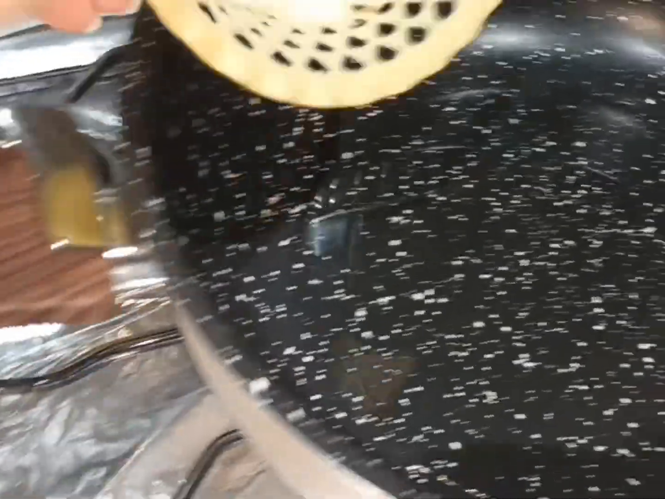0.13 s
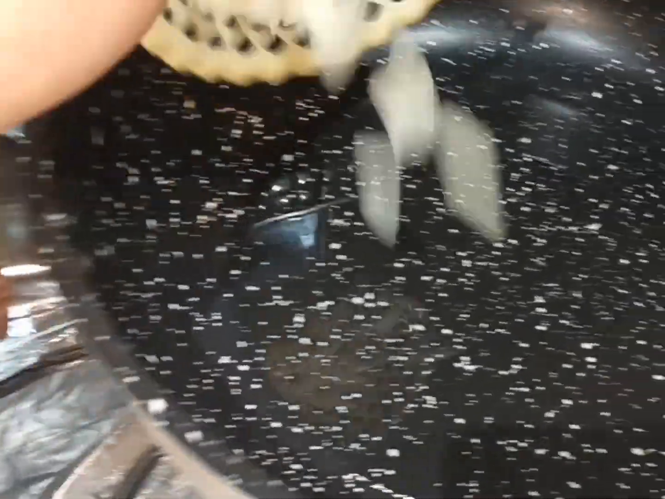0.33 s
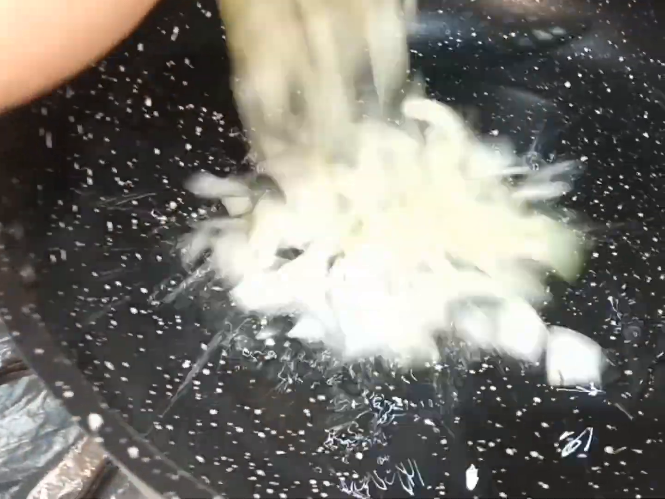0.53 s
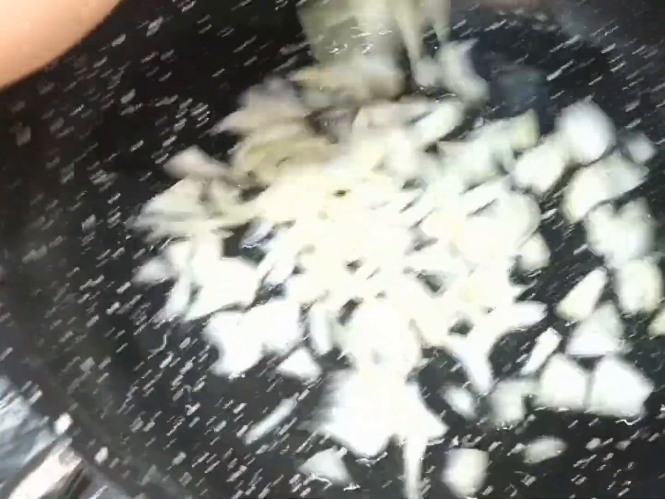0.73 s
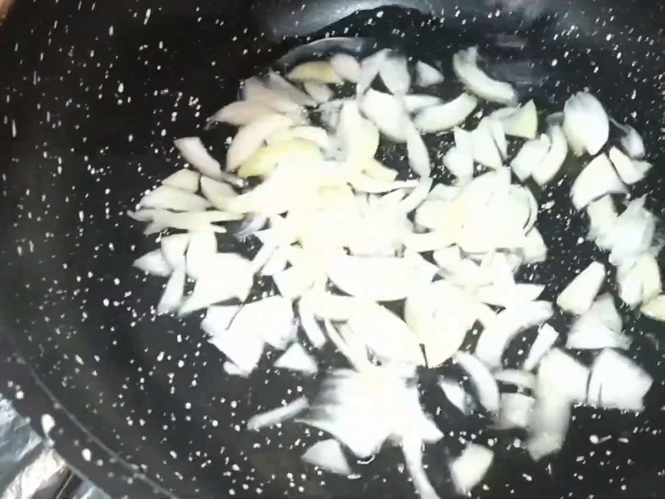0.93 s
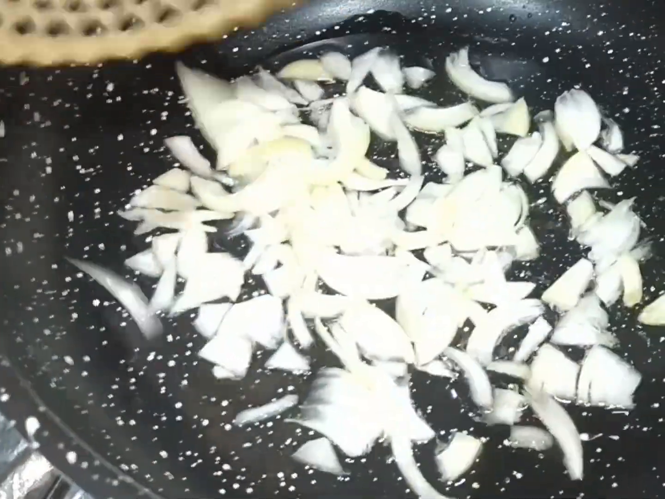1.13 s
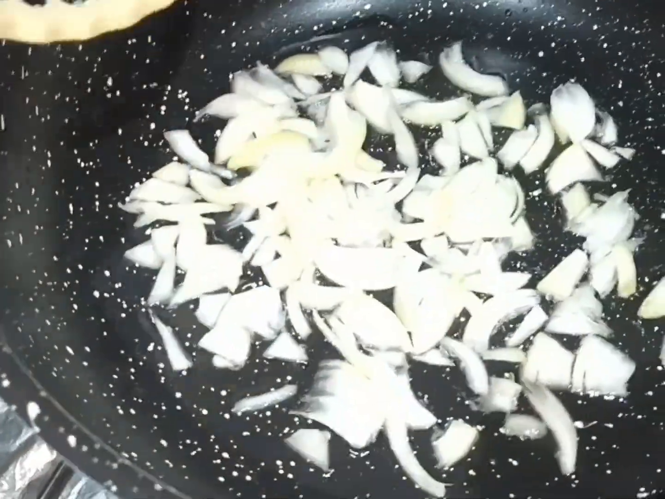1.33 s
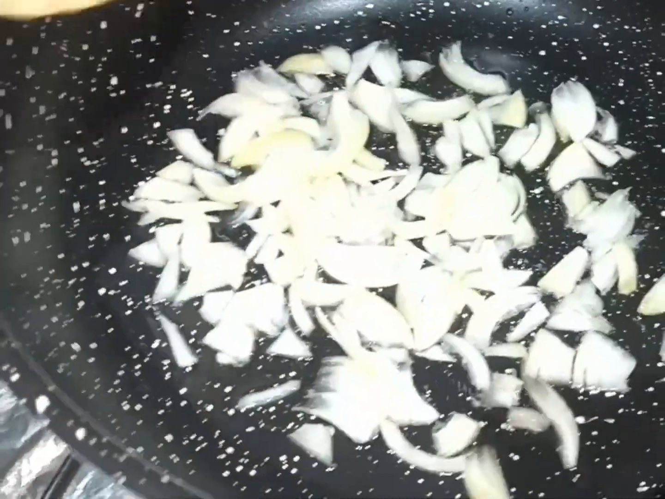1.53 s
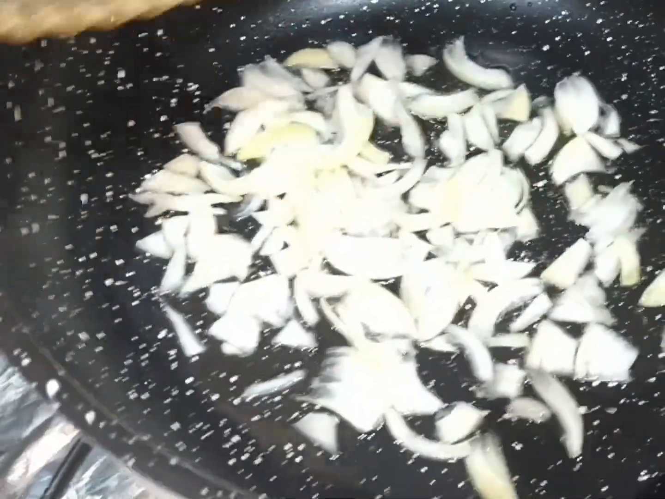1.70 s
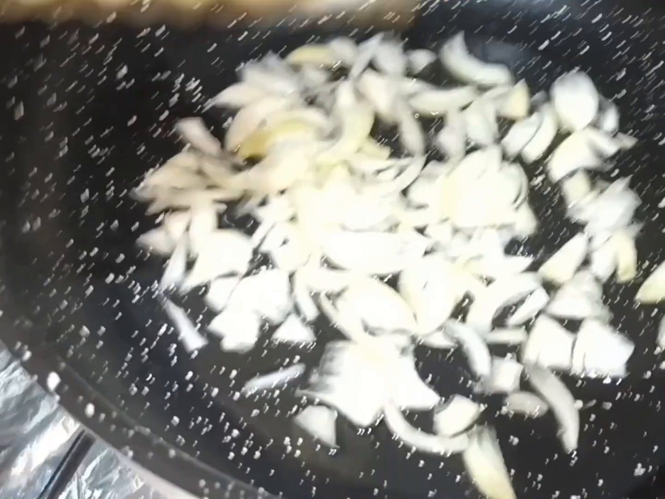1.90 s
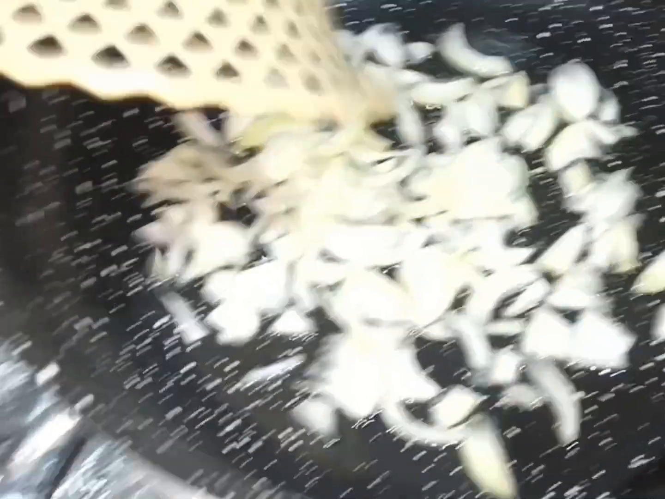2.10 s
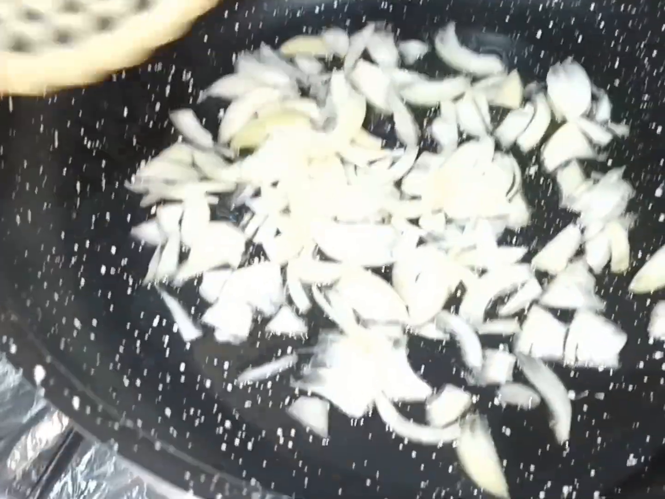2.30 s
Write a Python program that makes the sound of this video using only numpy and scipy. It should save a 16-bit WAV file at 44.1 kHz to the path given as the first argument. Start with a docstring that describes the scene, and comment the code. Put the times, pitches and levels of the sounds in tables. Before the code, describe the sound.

Sliced onions tumble into a pan, then a plastic colander knocks on the rim.

```python
"""Onion into a warm pan

A small kitchen, a stereo pair close to the stove. Sliced onion slides out of a plastic colander into
a warm nonstick pan: clumps drum on its floor, loose slices patter wetly after them, and bursting
bubbles set up a faint sizzle. The colander is then knocked on the rim, dully at first and twice
sharply, and the pan rings into the room. A limiter ducks the hardest blows."""
import sys
import numpy as np
from scipy import signal
from scipy.fft import rfft, irfft, next_fast_len
from scipy.io import wavfile

SR = 44100
rng = np.random.default_rng(int(sys.argv[2]) if len(sys.argv) > 2 else 0)


def wav_out(sig):
    """Save sig, one row per channel (or a flat mono array), as 16-bit PCM at SR to the path in sys.argv[1]."""
    wavfile.write(sys.argv[1], SR, np.round(np.clip(np.atleast_2d(sig).T, -1, 1) * 32767).astype(np.int16))


N = 103635
T = np.arange(N) / SR
AGE = T[:SR]  # seconds into a single event

# likeness of the two microphones: freq_hz, correlation
MIC_LIKENESS = [(60, 0.66), (300, 1), (500, 0.36), (950, 0.085), (3000, 0.22), (16000, 0)]
# balance between the microphones: freq_hz, left_over_right_db
MIC_BALANCE = [(60, 1), (300, 1.5), (600, 1.5), (1200, 2), (2000, 8), (4000, 5), (8000, 4.5), (15000, -4)]

# hiss of the quiet kitchen: freq_hz, level_db
ROOM_SPECTRUM = [(25, -13), (80, 4), (170, 2.5), (500, 3), (620, -8), (750, 8.5), (1150, -5.5), (1550, 12),
                 (1800, -4.5), (2120, 14), (2550, -0.5), (3000, 4.5), (5500, -18), (16000, -65)]
# low rumble under the cooking: time_s, level_db
RUMBLE_CURVE = [(.25, -81), (.38, -66.5), (.65, -63), (.82, -75), (1.2, -53.5), (1.4, -82.5), (1.75, -61),
                (2.25, -61), (2.35, -111)]
# its tone: freq_hz, level_db
RUMBLE_SPECTRUM = [(25, -30), (55, -26), (72, -22), (87, -0.5), (115, -27), (170, -9.5), (300, -7),
                   (1000, -82)]

# wet onion sizzling on warm metal: time_s, level_db
SIZZLE_CURVE = [(.22, -78), (.3, -46), (.5, -53.5), (.9, -54.5), (1.15, -56), (1.35, -58), (1.62, -54.5),
                (1.8, -61), (2.1, -58.5), (2.35, -63)]
# its tiny bubbles: freq_hz, level_db
SIZZLE_SPECTRUM = [(2500, -24), (4000, -9.5), (5200, -9), (7600, -11.5), (10500, -2.5), (12000, -15.5),
                   (13500, -18), (15000, -18), (16000, -4)]
# sheen that the sizzle draws from the pan: time_s, level_db
SHEEN_CURVE = [(.25, -79.5), (.4, -72), (.68, -56.5), (.8, -61), (1.18, -59.5), (1.35, -71)]
# its tone: freq_hz, level_db
SHEEN_SPECTRUM = [(3000, -45), (4500, -8), (5050, 1.5), (5450, -5), (5900, -1.5), (6700, -7), (9000, -42)]
# the loudest oil pops: start_s, pitch_hz, level_db, left_over_right_db
OIL_POPS = [(.786, 2800, -52, 10), (.98, 5420, -36, 9.5), (1.464, 4700, -48, 9)]
# small wet spits: start_s, level_db, left_over_right_db
SPITS = [(0.123, -54, 6), (0.401, -31, 7), (0.631, -43, 3), (0.746, -44, -1), (1.613, -41, 3),
         (2.219, -38, -11), (2.228, -55, -26)]
# their tone: freq_hz, level_db
SPIT_SPECTRUM = [(1000, -20), (3500, -12), (6400, 11), (8000, -3), (11500, 12.5), (13000, -39),
                 (15500, 5.5)]

# clumps landing in the pan: start_s, ring_db, slap_db
CLUMP_LANDINGS = [(0.235, -36, -51), (.263, -24, -31.5), (.277, -31, -47), (0.288, -28, -57),
                  (0.34, -24, -42), (0.355, -28, -47), (.364, -28, -49), (.412, -29.5, -35),
                  (.474, -32.5, -39.5), (0.517, -42, -44.5), (.57, -41.5, -47.5), (.632, -46, -67),
                  (.672, -48, -45), (0.691, -51, -44)]
# the pan's floor ringing under the onion: pitch_hz, level_db, t60_s
PAN_FLOOR_MODES = [(295, 0, .17), (330, -12, .17), (393, -15, .17), (432, -5, .12), (470, -12, .15),
                   (522, -13, .2), (655, -17, .13), (840, -9, .11), (1085, -19, .11), (1362, -19, .17)]
# slap of a clump: freq_hz, level_db
SLAP_SPECTRUM = [(100, -38), (200, -14), (290, 6.5), (520, 4.5), (680, -9), (860, -2.5), (1300, -37),
                 (1800, -36), (5000, -44)]
# patter of loose slices: time_s, wet_db, body_db
PATTER_CURVE = [(0.228, -70, -106), (0.239, -35, -53), (0.254, -38.5, -45), (.28, -46, -48.5),
                (0.327, -53.5, -48.5), (0.346, -33.5, -37.5), (.375, -36.5, -33), (0.408, -37.5, -39),
                (.44, -40.5, -45), (.57, -45.5, -62.5), (.64, -49, -63.5), (.72, -66, -65),
                (0.854, -66, -70.5)]
# its wet crackle: freq_hz, level_db
WET_SPECTRUM = [(1470, -29), (2500, -12), (3210, -13), (4050, -4), (5780, 2), (8140, -6.5), (9660, 0.5),
                (11500, -4), (13500, -15), (14900, -2), (16000, -5.5)]
# its soft body: freq_hz, level_db
BODY_SPECTRUM = [(80, -28), (180, -0.5), (300, -3.5), (700, 8), (1500, -2), (2600, -2.5), (4000, -3),
                 (7000, -12)]

# colander on the rim: start_s, crack_db, treble_db, thud_db, ring_db, room_db, thock_db
RIM_KNOCKS = [(0.8593, -20.5, -15, -31.5, -44, -42, -24.5), (0.884, -40, -12, -54, -48, -62, -24),
              (0.941, -39, -31, -38, -58, -44.5, -34), (0.979, -40.5, -9, -39.5, -79, -56, -42),
              (1.048, -32, -34.5, -42.5, -47, -49, -35.5), (1.4752, -26.5, -22.5, -37.5, -47.5, -42.5, -32),
              (1.635, -58, -43, -50, -59, -67, -47.5), (1.789, -16, 4, -28, -40, -26, -66),
              (1.9603, -20, 4.5, -31, -42, -30.5, -65), (2.124, -62, -26, -54.5, -56.5, -57.5, -41.5)]
# the pan struck at its rim: pitch_hz, level_db, t60_s
PAN_RIM_MODES = [(292, -8, .25), (347, -1, .34), (440, -6, .3), (463, -4, .25), (493, -4, .22),
                 (520, -10, .35), (662, -13, .28), (975, 1, .3), (1362, 3, .32), (1927, 3, .32),
                 (2449, 2, .28), (4834, -2, .14), (5044, 0, .26), (5262, 0, .22), (5480, -2, .18),
                 (5728, -3, .23)]
# crack of plastic on metal: freq_hz, level_db
CRACK_SPECTRUM = [(150, 12), (400, -42), (750, -13), (1250, -8.5), (1850, -3), (2200, -13), (2600, -1),
                  (3600, -22), (4500, 1), (5300, 4.5), (6200, -9), (7600, -10), (9200, -4), (11000, -8),
                  (12300, -13), (13800, -30), (14800, -9), (16500, -2.5)]
# hollow body of the colander: pitch_hz, level_db, t60_s
COLANDER_MODES = [(405, -2, .06), (462, 0, .09)]
# low notes that build after a blow and hang on: pitch_hz, level_db, rise_s, t60_s
HANGING_NOTES = [(96, -15, .06, .3), (135, -15, .08, .3), (167, -12, .13, .32), (241, -10, .14, .28),
                 (440, -11, .12, .24), (526, -13, .14, .25)]
# slow boom in the room: freq_hz, level_db
BOOM_SPECTRUM = [(40, -18), (65, -20), (85, -4.5), (130, -5), (190, 1), (300, -1.5), (500, -0.5),
                 (600, -19), (1200, -11.5), (4000, -38)]
# the kitchen's bright tail: freq_hz, level_db
TAIL_SPECTRUM = [(60, -24), (500, -2), (1000, -6.5), (2000, -3.5), (3500, -1.5), (4500, 0), (5300, 6),
                 (6500, -6), (8000, -10), (10000, -0.5), (13000, -16.5), (15000, -17)]
# its decay: freq_hz, t60_s
TAIL_DECAY = [(500, 0.47), (2000, 0.27), (5000, 0.28), (9000, 0.18), (15000, 0.19)]

FLOOR_CUT_HZ, RIM_CUT_HZ = 277, 142
CUSHION_FROM_S, CUSHION_DB_PER_S, CUSHION_ABOVE_HZ = .38, 45, 650  # the growing heap dulls later clumps


def amp(db):
    """Decibels to gain."""
    return 10 ** (np.asarray(db) / 20)


def unit(x):
    """Scales to rms 1."""
    return x / np.sqrt(np.mean(x ** 2) + 1e-20)


def read(points, hz):
    """Reads a table on a log-frequency axis."""
    freqs, values = np.transpose(points)
    return np.interp(np.log(hz + 1), np.log(freqs + 1), values)


def fader(curve):
    """Gain over the scene from a level curve."""
    return amp(np.interp(T, *np.transpose(curve)))


def balance(db):
    """Left and right gains for a level difference."""
    return amp(np.array([np.atleast_1d(db), -np.atleast_1d(db)]) / 2)


def add(mix, start_s, sound):
    """Mixes a sound in at a time."""
    part = mix[:, max(round(start_s * SR), 0):][:, :sound.shape[1]]
    part += sound[:, :part.shape[1]]


def rise(seconds):
    """Linear attack."""
    return np.minimum(AGE / seconds, 1)


def fade(t60_s, hold_s=0):
    """Exponential decay, after an optional rounded plateau."""
    return np.exp(-np.log(1000) * (np.hypot(AGE, hold_s) - hold_s) / t60_s)


def low_cut(x, hz):
    """Takes the bass out."""
    return signal.sosfilt(signal.butter(4, hz, "highpass", fs=SR, output="sos"), x)


def colour(x, spectrum):
    """Shapes two unrelated channels as the microphones hear them: bass central, treble wide and left."""
    size = next_fast_len(x.shape[1])
    hz = np.fft.rfftfreq(size, 1 / SR)
    left, other = rfft(x, size)
    likeness = read(MIC_LIKENESS, hz)
    right = likeness * left + np.sqrt(1 - likeness ** 2) * other
    pair = np.array([left, right]) * balance(read(MIC_BALANCE, hz))
    return unit(irfft(pair * amp(read(spectrum, hz)), size)[:, :x.shape[1]])


def noise(spectrum, size=SR):
    """Coloured stereo noise."""
    return colour(rng.standard_normal((2, size)), spectrum)


def grains(spectrum, per_s, spread_db):
    """A dense rain of tiny clicks of uneven size."""
    sizes = amp(spread_db * np.minimum(rng.exponential(1, N), 5))
    hits = rng.random(N) < per_s / SR
    return colour(sizes * hits * rng.standard_normal((2, N)), spectrum)


def ring(modes, cut_hz):
    """Dying sines with little bass; the higher ones reach the two microphones out of step."""
    out = np.zeros((2, SR))
    for hz, db, t60 in modes:
        lag = np.arccos(read(MIC_LIKENESS, hz)) * np.array([[.5], [-.5]]) * rng.choice([-1, 1])
        tone = np.sin(2 * np.pi * hz * AGE + lag)
        out += amp(db) * balance(read(MIC_BALANCE, hz)) * fade(t60, hold_s=.13 * t60) * tone
    return low_cut(out * rise(seconds=.002), cut_hz)


def background():
    """Quiet room hiss and a low rumble that comes and goes."""
    hiss = amp(-66.5) * noise(ROOM_SPECTRUM, N)
    return hiss + fader(RUMBLE_CURVE) * noise(RUMBLE_SPECTRUM, N)


def pop(hz, db, side_db):
    """One bursting bubble: a snap half an octave wide."""
    size = SR // 20
    band = signal.butter(2, [hz / 2 ** .25, hz * 2 ** .25], "bandpass", fs=SR, output="sos")
    snap = unit(signal.sosfilt(band, rng.standard_normal((2, size))))
    return amp(db) * balance(side_db) * snap * fade(t60_s=.012)[:size]


def sizzle():
    """Tiny bubbles burst and ring the pan, among larger pops and a few wet spits."""
    out = np.zeros((2, N))
    for curve, spectrum in (SIZZLE_CURVE, SIZZLE_SPECTRUM), (SHEEN_CURVE, SHEEN_SPECTRUM):
        out += fader(curve) * grains(spectrum, per_s=7000, spread_db=2.2)
    pops_per_s, low_hz, high_hz = 60, 3400, 9000
    under_sizzle_db, spread_db, width_db = 2, 2.5, 7
    for when, pitch, size, side in rng.random((round(pops_per_s * T[-1]), 4)):
        start_s = when * T[-1]
        sizzle_db = np.interp(start_s, *np.transpose(SIZZLE_CURVE))
        db = sizzle_db - under_sizzle_db + spread_db * min(-np.log(size), 2)
        add(out, start_s, pop(low_hz * (high_hz / low_hz) ** pitch, db, width_db * (2 * side - 1)))
    for start_s, hz, db, side_db in OIL_POPS:
        add(out, start_s, pop(hz, db, side_db))
    for start_s, db, side_db in SPITS:
        tick_and_tail = fade(t60_s=.025) + amp(-19.5) * fade(t60_s=.24)
        add(out, start_s, amp(db) * balance(side_db) * noise(SPIT_SPECTRUM) * tick_and_tail)
    return out


def onion_clumps():
    """Soft clumps slap the pan's floor and ring it, each at a slightly different pitch."""
    out = np.zeros((2, N))
    for start_s, ring_db, slap_db in CLUMP_LANDINGS:
        detune = 1 + .011 * rng.standard_normal()
        dull_db = CUSHION_DB_PER_S * max(start_s - CUSHION_FROM_S, 0)
        modes = [(hz * detune, db - dull_db * (hz > CUSHION_ABOVE_HZ), t60)
                 for hz, db, t60 in PAN_FLOOR_MODES]
        thump = amp(ring_db) * ring(modes, FLOOR_CUT_HZ)
        slap = amp(slap_db) * low_cut(noise(SLAP_SPECTRUM) * fade(t60_s=.13), FLOOR_CUT_HZ)
        add(out, start_s, low_cut(thump + slap, hz=225))
    return out


def loose_slices():
    """Slices patter down with a wet crackle; their soft bodies drum the floor's low modes."""
    times, wet_db, body_db = np.transpose(PATTER_CURVE)
    falling = (T > times[0]) * (T < times[-1])
    wet, body = [falling * amp(np.interp(T, times, db)) * grains(spectrum, per_s=6200, spread_db=2)
                 for db, spectrum in ((wet_db, WET_SPECTRUM), (body_db, BODY_SPECTRUM))]
    floor = ring([mode for mode in PAN_FLOOR_MODES if mode[0] < CUSHION_ABOVE_HZ], FLOOR_CUT_HZ)
    drumming = signal.fftconvolve(body[:1], floor / np.linalg.norm(floor[0]), axes=1)[:, :N]
    return wet + body + amp(-7) * drumming


def kitchen_tail(ripple):
    """Diffuse sound back from the walls, its treble dying first."""
    hz = np.fft.rfftfreq(SR, 1 / SR)
    spectrum = rfft(noise(TAIL_SPECTRUM)) * ripple
    centres, t60s = np.transpose(TAIL_DECAY)
    return sum(irfft(spectrum * np.interp(hz, centres, band), SR) * fade(t60, hold_s=.049)
               for band, t60 in zip(np.eye(len(t60s)), t60s))


def room_boom():
    """Low noise that swells in the room after a blow."""
    return amp(-11) * noise(BOOM_SPECTRUM) * rise(seconds=.04) ** 2 * fade(t60_s=.28, hold_s=.22)


def low_notes(max_offset_hz=6):
    """Deep notes swell slowly in the centre, each a close pair of sines that beats."""
    out = np.zeros(SR)
    for hz, db, rise_s, t60 in HANGING_NOTES:
        pair = sum(np.sin(2 * np.pi * ((hz + side * max_offset_hz * rng.random()) * AGE + rng.random()))
                   for side in (-1, 1))
        out += amp(db) * rise(rise_s) * fade(t60, hold_s=.28) * pair / np.sqrt(2)
    return amp(-1.5) * out


def rim_ring(thud_db, ring_db, treble_db, thud_below_hz=800, tilt_to_hz=3900):
    """The struck pan thuds low and rings high; a dull blow excites the upper modes less."""
    modes = []
    for hz, db, t60 in PAN_RIM_MODES:
        blow_db = thud_db if hz < thud_below_hz else ring_db
        modes.append((hz, db + blow_db + treble_db * min(hz / tilt_to_hz, 1), t60))
    return ring(modes, RIM_CUT_HZ)


def colander_crack(ripple, chatter_db=2.2, chatter_per_s=350):
    """The plastic gives before it stops, then chatters on the rim."""
    jitter = np.interp(AGE * chatter_per_s, np.arange(chatter_per_s), rng.standard_normal(chatter_per_s))
    chatter = unit(amp(chatter_db * jitter))
    burst = unit(irfft(rfft(noise(CRACK_SPECTRUM)) * ripple, SR))
    decay = fade(t60_s=.028) + amp(1) * fade(t60_s=.075)
    return burst * chatter * rise(seconds=.0016) * decay


def colander_knocks(shelf_hz=5400, ripple_db=3.5, ripple_step_hz=120):
    """Each blow cracks, sounds the pan and the hollow colander, and leaves a tail and a boom."""
    out = np.zeros((2, N))
    hz = np.fft.rfftfreq(SR, 1 / SR)
    shelf = 1 - 1 / (1 + (hz / shelf_hz) ** 8)
    # close-set upper resonances of the pan
    peaks = np.interp(hz / ripple_step_hz, np.arange(len(hz)), rng.standard_normal(len(hz)))
    ripple = amp(ripple_db * peaks)
    for start_s, crack_db, treble_db, thud_db, ring_db, room_db, thock_db in RIM_KNOCKS:
        crack = amp(crack_db) * colander_crack(ripple)
        tail = amp(room_db) * kitchen_tail(ripple)
        shelved = irfft(rfft(crack + tail) * amp(treble_db * shelf), SR)
        add(out, start_s, low_cut(shelved[:, :SR // 2], hz=251))
        boom = amp(thud_db) * room_boom()
        thock = amp(thock_db) * ring(COLANDER_MODES, RIM_CUT_HZ) * rise(seconds=.006)
        metal = rim_ring(thud_db, ring_db, treble_db)
        add(out, start_s, metal + thock + boom + amp(thud_db) * low_notes())
    return out


def scene():
    """Onion, knocks and sizzle in a quiet kitchen, as they reach the microphones."""
    return onion_clumps() + loose_slices() + colander_knocks() + sizzle() + background()


def record(dry):
    """A limiter ducks after the sharp blows and lets their tails swell back; then the band limit."""
    threshold_db, share, attack_s, recover_db_per_s, top_hz = -25, .65, .002, 115, 15750
    pole = np.exp(-1 / (attack_s * SR))
    power = signal.lfilter([1 - pole], [1, -pole], (dry ** 2).mean(0))
    cut_db = share * np.maximum(10 * np.log10(power + 1e-12) - threshold_db, 0)
    held_db = np.maximum.accumulate(cut_db + recover_db_per_s * T) - recover_db_per_s * T
    ducked = dry * amp(-signal.lfilter([1 - pole], [1, -pole], held_db))
    lowpass = signal.firwin(255, top_hz, window=("kaiser", 9), fs=SR)
    return signal.oaconvolve(ducked, lowpass[None], "same")


dry = scene()
out = record(dry)
wav_out(out)
```